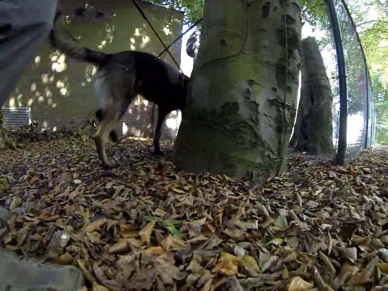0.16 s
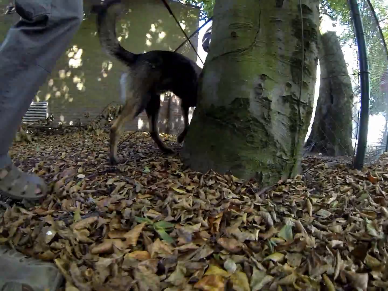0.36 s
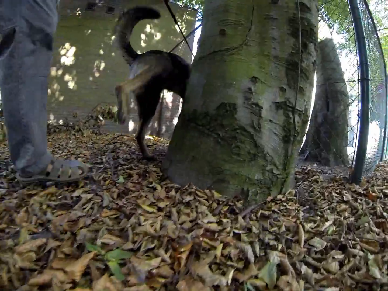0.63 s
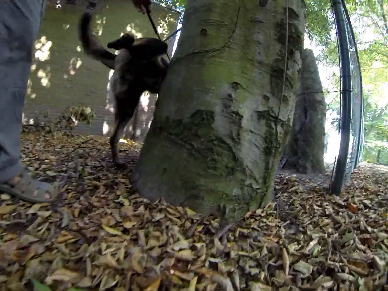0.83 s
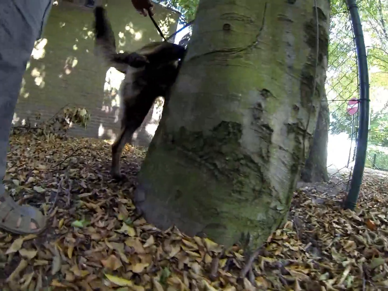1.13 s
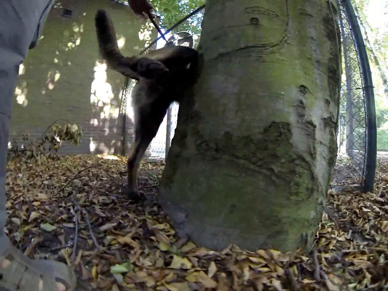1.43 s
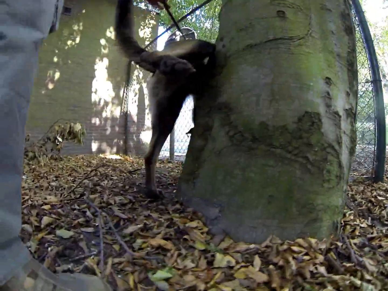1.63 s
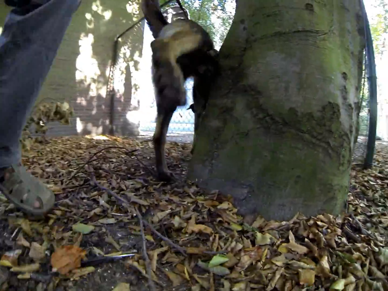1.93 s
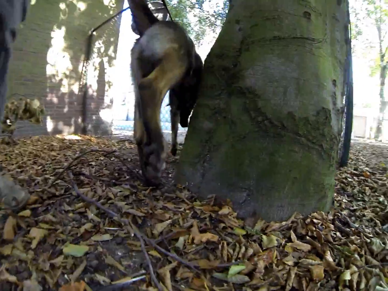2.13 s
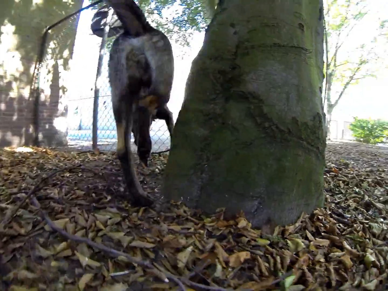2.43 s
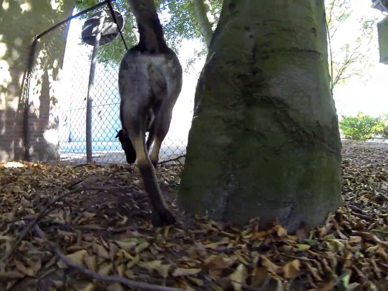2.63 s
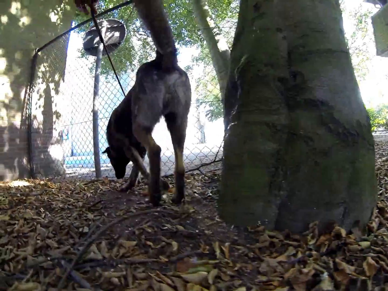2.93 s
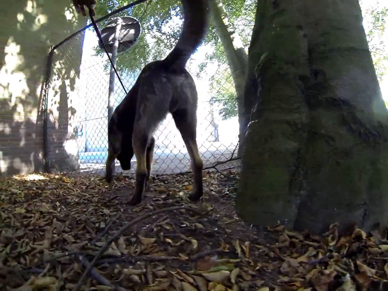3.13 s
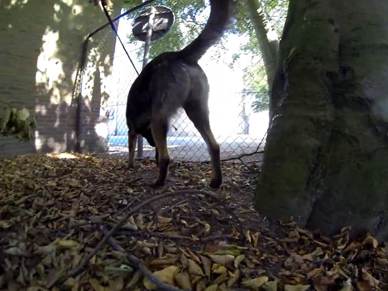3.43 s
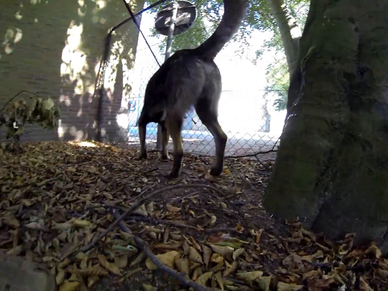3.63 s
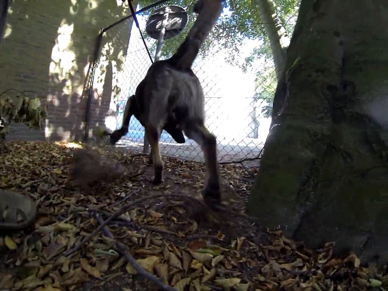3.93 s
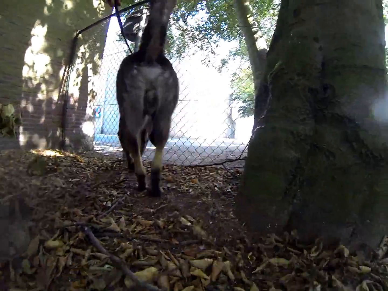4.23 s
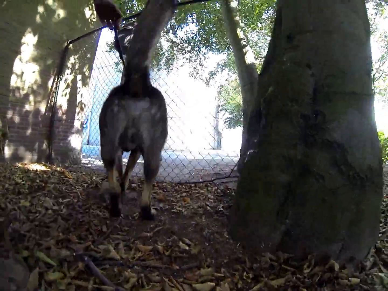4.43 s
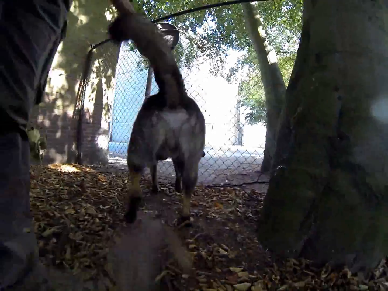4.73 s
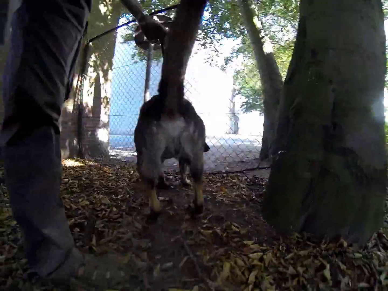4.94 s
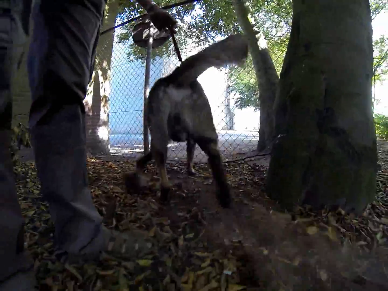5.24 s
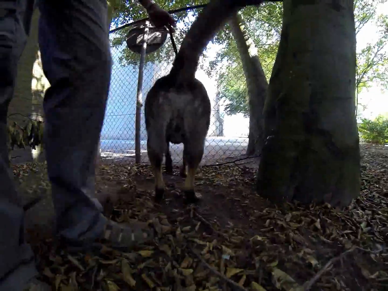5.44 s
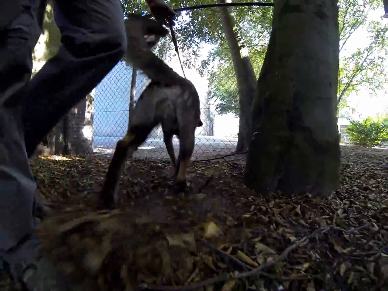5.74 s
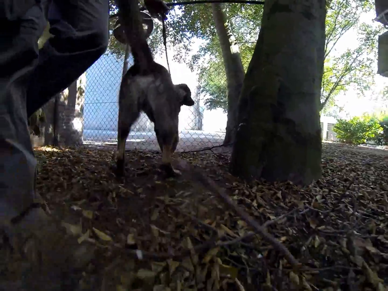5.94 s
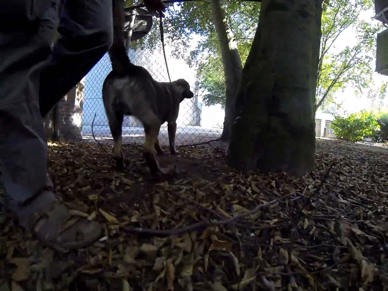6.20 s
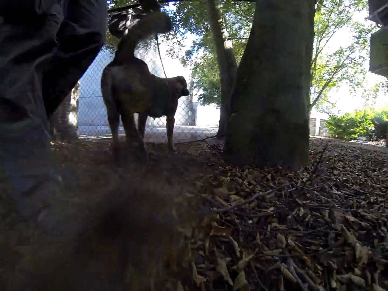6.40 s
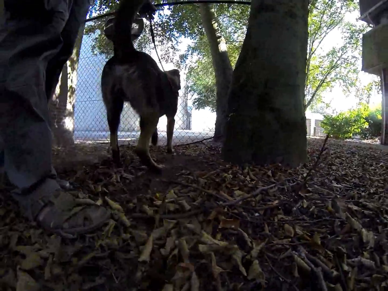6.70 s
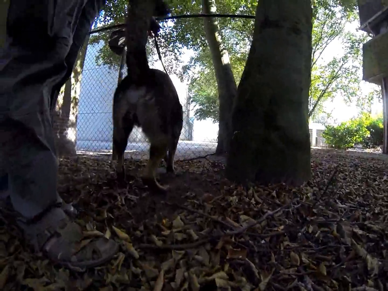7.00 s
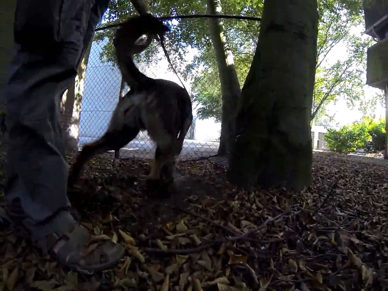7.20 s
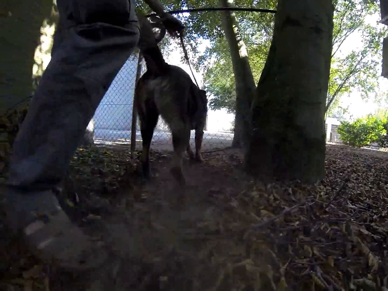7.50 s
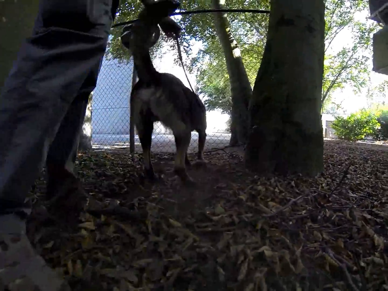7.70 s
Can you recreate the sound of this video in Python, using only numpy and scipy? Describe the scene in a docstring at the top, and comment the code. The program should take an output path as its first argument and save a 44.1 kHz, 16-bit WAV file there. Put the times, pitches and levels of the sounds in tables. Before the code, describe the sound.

Dry leaves rustle under paws and shoes, then get raked in brisk bursts; dirt smacks the microphone's plastic case twice, the first blow very loud.

```python
"""A dog and its walker shuffle through dry leaves; the dog rakes the litter with its hind paws and kicks it up.
Leaves are noise, random breaks and short ringing grains, shaped by strokes; twigs snap as brief force bursts.
Two volleys of dirt strike the plastic case of a hand-held camera, whose resonances also colour leaves and air.
Its handle sways, hums and bumps as damped or shaken modes. The hardest blows make a limiter duck everything."""
import sys
import numpy as np
from scipy import signal
from scipy.fft import rfft, irfft, next_fast_len
from scipy.io import wavfile
from scipy.ndimage import uniform_filter1d, minimum_filter1d, map_coordinates

SR = 44100
rng = np.random.default_rng(int(sys.argv[2]) if len(sys.argv) > 2 else 0)


def output_pcm(signal):
    """Save a mono or channel-first signal as 16-bit PCM at the path in sys.argv[1].

    Samples are clipped to [-1, 1] before scaling.
    """
    pcm = np.clip(np.atleast_2d(signal).T, -1, 1) * 32767
    wavfile.write(sys.argv[1], SR, np.round(pcm).astype(np.int16))


N = 346621
TIME = np.arange(N) / SR  # s
LEVEL_WINDOW = 66  # samples, 1.5 ms: the span of a short-time level

# Relative spectrum of dirt on the case, without the case resonances.
# Each row: frequency in Hz, density in dB per Hz.
CLOD_SPECTRUM = [(80, -10.5), (250, -6.5), (500, -9.5), (700, 0), (870, -11), (1100, -2), (1350, -3.5),
                 (1900, -3.5), (2800, -2), (4000, -6.5), (5500, -17), (7500, -17), (9000, -19.5),
                 (11000, -20.5), (14000, -24.5), (15600, -38)]


def amp(db):
    """Level to amplitude: 20 dB is a factor of ten."""
    return 10 ** (np.asarray(db) / 20)


def unit(x):
    """Normalisation to equal mean power: x at rms 1."""
    return x / np.sqrt(np.mean(x ** 2) + 1e-20)


def add(track, s, sound):
    """Superposition: add a sound to the track from time s in seconds."""
    part = track[round(s * SR):][:len(sound)]
    part += sound[:len(part)]


def filtered(x, response):
    """Linear filtering: multiply the spectrum of x by a response of frequency."""
    m = next_fast_len(len(x) + 8192)
    spectrum = rfft(x, m) * response(np.fft.rfftfreq(m, 1 / SR))
    return irfft(spectrum, m)[:len(x)]


def below(hz, edge_hz, order=8):
    """Soft low-pass response: the amplitude is halved at the edge."""
    return 1 / (1 + (hz / edge_hz) ** order)


def white():
    """White noise: independent random pressure at every sample."""
    return rng.standard_normal(N)


def case_ring(spectrum, size=4096):
    """Minimum-phase response: folding the cepstrum makes source colour and case resonances causal."""
    # Resonances of the case. Each row: frequency in Hz, width in Hz, lift in dB.
    case_modes = [(665, 78, 2), (1418, 310, 10), (1632, 265, 9), (2129, 174, 7), (2392, 47, 7),
                  (2753, 83, 2.5), (3010, 67, 4), (3488, 63, 5), (3896, 140, 7), (4910, 450, 5),
                  (5360, 160, 7), (6580, 610, 6), (10350, 480, 3)]
    hz = np.fft.rfftfreq(size, 1 / SR)
    source_hz, source_db = np.transpose(spectrum)
    db = np.interp(np.log(hz + 1), np.log(source_hz), source_db)
    for centre, width, lift in case_modes:
        db = db + lift * .5 ** ((2 * (hz - centre) / width) ** 2)
    cepstrum = irfft(np.log(amp(db)))
    cepstrum[1:size // 2] *= 2
    cepstrum[size // 2 + 1:] = 0
    return irfft(np.exp(rfft(cepstrum)))[:size // 2]


def through_case(x, spectrum):
    """Source-filter principle: x convolved with the response of source and case, at rms 1."""
    return unit(signal.fftconvolve(x, case_ring(spectrum))[:N])


def wobble(rate):
    """Slow random modulation: a spline through random knots, rate knots a second."""
    knots = rng.standard_normal(int(N * rate / SR) + 4)
    return map_coordinates(knots, [TIME * rate])


def drifting(x, depth_db, size=1024):
    """Time-varying colour: a smooth random gain over time and frequency, as other leaves or places take over."""
    bands = signal.stft(x, nperseg=size)[2]
    field = rng.standard_normal(bands.shape)
    field = uniform_filter1d(uniform_filter1d(field, size=14, axis=0), size=10, axis=1)
    return signal.istft(bands * amp(depth_db * unit(field)), nperseg=size)[1][:len(x)]


def stroke(length, attack, release, swell_db=0.5):
    """Envelope of a movement: smooth onset, slight arch, then exponential decay; times in seconds."""
    t = np.arange(int((length + 7 * release) * SR)) / SR
    onset = np.sin(np.pi / 2 * np.minimum(t / attack, 1))
    # swell_db is the rise from the ends to the middle
    arch_db = swell_db * (np.sin(np.pi * np.minimum(t / (length + release), 1)) - 2 / 3)
    decay = np.exp(-np.maximum(t - length, 0) / release)
    return onset * amp(arch_db) * decay


def movements(rows, attack, release):
    """Incoherent addition: the powers of strokes (start s, length s, dB) sum."""
    power = np.zeros(N)
    for s, length, db in rows:
        add(power, max(s, 0), (amp(db) * stroke(length, attack, release)) ** 2)
    return power


def swell(s, length):
    """Gaussian envelope around time s; length is twice its standard deviation, in seconds."""
    return np.exp(-np.minimum((2 * (TIME - s) / length) ** 2 / 2, 50))


def contact(ring, treble_db, crumble, grit, split_hz, size=4096):
    """Impact excitation: a push and decaying grit ring a response; the loudest 1.5 ms has rms 1."""
    t = np.arange(size) / SR
    force = grit * rng.standard_normal(size) * amp(-20 * t / crumble)  # falls 20 dB in crumble seconds
    force[0] += 1
    x = signal.fftconvolve(force, ring)[:size]
    body = signal.sosfilt(signal.butter(2, split_hz, fs=SR, output="sos"), x)
    edge = signal.sosfilt(signal.butter(4, split_hz, "high", fs=SR, output="sos"), x)
    x = unit(body) + amp(treble_db) * unit(edge)
    return x / np.sqrt(uniform_filter1d(x ** 2, size=LEVEL_WINDOW).max())


def footwork():
    """Power summation per band: gains of rustle, crisp top and low crunch from all leaf movements."""
    # Paws and shoes treading on leaves. Each row: start in seconds, length in seconds, rustle level in dB,
    # crisp top in dB re rustle, low crunch in dB re rustle.
    step_rows = [(0.0, 0.016, -50, -10, 2), (.09, 0.089, -57, -15, -4), (0.252, .24, -54, -13, 2.5),
                 (0.66, 0.13, -56, -19, -2.5), (.84, 0.33, -57, -18, -0.5), (1.007, 0.085, -45.5, -18, 1.5),
                 (1.086, 0.067, -43, -20, -2), (1.17, 0.096, -54, -22, -2), (1.517, 0.085, -62, -15, 8),
                 (1.679, 0.091, -51, -13.5, 3), (1.794, 0.052, -48, -15, -4.5),
                 (1.902, 0.11, -56.5, -15, -3), (2.104, .09, -54.5, -15, 6.5), (2.753, 0.41, -60.5, -16, 0),
                 (3.183, 0.17, -52, -15.5, 0), (3.318, 0.048, -43, -17.5, -0.5),
                 (3.402, .12, -53, -19, 0.5), (3.563, 0.047, -53, -19, 7), (3.655, .23, -52.5, -13, 2.5),
                 (4.27, 0.14, -53, -17, 4.5), (5.081, 0.028, -44.5, -14, 4.5), (7.2, 0.043, -49.5, -22, -2),
                 (7.72, 0.028, -47.5, -14, 3.5), (7.805, .06, -52, -15.5, -5)]
    # Hind paws raking the litter backwards. Each row: start in seconds, length in seconds,
    # rustle level in dB, crisp top in dB re rustle.
    scrape_rows = [(3.915, .07, -43, -12), (4.051, 0.15, -43, -14.5), (4.215, 0.19, -47.5, -15.5),
                   (4.46, 0.064, -42, -14), (4.53, 0.061, -39, -18), (4.689, .2, -44, -16),
                   (4.993, 0.028, -43.5, -14), (5.064, 0.025, -41.5, -12.5), (5.19, 0.21, -46.5, -15),
                   (5.4, 0.21, -44, -15), (5.625, 0.056, -40.5, -13), (5.681, 0.028, -37, -16),
                   (5.785, 0.17, -41, -13.5), (5.922, 0.094, -35.5, -15.5), (6.053, 0.055, -38, -17),
                   (6.259, 0.039, -40, -17.5), (7.06, .07, -46, -17), (7.171, 0.073, -51, -15),
                   (7.27, 0.13, -45, -16)]
    # Leaves kicked high pattering down. Each row: start in seconds, length in seconds, rustle level in dB.
    shower_rows = [(3.95, 2.6, -53.5), (6.481, 0.14, -39.5), (7.401, 0.073, -36)]
    scrape_crunch_db = -5.5
    shower_crisp_db, shower_crunch_db = -13, -9
    stir_levels_db = -64 + np.array([0, -13.5, -4.5])  # the litter is never quite still

    treads = [(s, length, db + np.array([0, crisp, crunch])) for s, length, db, crisp, crunch in step_rows]
    rakes = [(s, length, db + np.array([0, crisp, scrape_crunch_db])) for s, length, db, crisp in scrape_rows]
    showers = [(s, length, db + np.array([0, shower_crisp_db, shower_crunch_db]))
               for s, length, db in shower_rows]
    # attack and release in seconds: a tread presses and stops, flung leaves take a while to settle
    kinds = [(treads, 0.025, 0.039), (rakes, 0.049, 0.072), (showers, 0.03, 0.16)]
    gains = []
    for band, stir_db in enumerate(stir_levels_db):
        power = amp(stir_db) ** 2
        for rows, attack, release in kinds:
            band_rows = [(s, length, db[band]) for s, length, db in rows]
            power = power + movements(band_rows, attack, release)
        gains.append(np.sqrt(power))
    return gains


def crackle(rate=700, low_hz=1400, high_hz=11000, cycles=5, scatter_db=3.0, size=256):
    """Granular excitation: leaves break one by one, each a damped sine at its own pitch; rms 1."""
    draws = rng.random((int(rate * N / SR), 4))
    start = (draws[:, :1] * N).astype(int)
    hz = low_hz + (high_hz - low_hz) * draws[:, 1:2]
    loudness = amp(scatter_db * np.minimum(-np.log(draws[:, 2:3]), 4))
    sign = np.sign(draws[:, 3:] - .5)
    turns = hz * np.arange(size) / SR
    grains = loudness * sign * np.sqrt(hz) * np.exp(-turns / cycles) * np.sin(2 * np.pi * turns)
    places = start + np.arange(size)
    return unit(np.bincount(places.ravel(), grains.ravel(), N)[:N])


def leaves(cracks_per_s=3200, scatter_db=1.0, slide=1.0, clump_db=1.26, crackle_db=-2):
    """Stochastic friction and fracture: many clumped edge breaks over the hiss of sliding leaves."""
    # Relative spectrum of leaves without the case. Each row: frequency in Hz, density in dB per Hz.
    leaf_spectrum = [(200, -30.5), (1100, -25.5), (1350, -12), (1900, -16.5), (2300, -12.5), (3500, -5.5),
                     (4300, -9), (5900, -14), (7000, -13.5), (8000, -13.5), (9200, -24), (11000, -23.5),
                     (14000, -30), (15600, -45.5)]
    rustle_gain, crisp_gain, crunch_gain = footwork()
    breaks = rng.random(N) < cracks_per_s / SR
    sizes = rng.choice([-1, 1], N) * amp(scatter_db * np.minimum(rng.exponential(size=N), 4.5))
    force = unit(breaks * sizes) + slide * white() + amp(crackle_db) * crackle()
    x = drifting(through_case(force, leaf_spectrum), depth_db=2.0) * amp(clump_db * wobble(50))
    # each movement has its own balance of low crunch, rustle and crisp top
    crunch = filtered(x, lambda hz: below(hz, 1700, order=16))
    crisp = filtered(x, lambda hz: 1 - below(hz, 8330, order=16))
    rustle = x - crunch - crisp
    return rustle_gain * unit(rustle) + crisp_gain * unit(crisp) + crunch_gain * unit(crunch)


def drone(centre_hz, width_hz):
    """Randomly driven resonance: narrow-band noise divided by its slow envelope, rms 1."""
    band = filtered(white(), lambda hz: below(abs(hz - centre_hz), width_hz / 2, order=2))
    analytic = signal.hilbert(band, next_fast_len(N))[:N]
    power = np.abs(uniform_filter1d(abs(analytic) ** 2, size=4000))
    return unit(analytic.real / np.sqrt(power + 1e-20))


def handle():
    """Modal response: the handle sways on its lowest mode; grip shifts make the mount hum and rub dully."""
    # Slow sway of the handle. Each row: time in seconds, level in dB.
    sway_rows = [(0.0, -37.5), (0.71, -47.5), (1.31, -33.5), (1.42, -45), (1.98, -36.5), (2.46, -51.5),
                 (2.62, -38), (2.87, -46.5), (4.2, -48), (4.34, -34.5), (4.96, -41), (5.44, -36),
                 (5.67, -50), (5.74, -37), (5.88, -45.5), (6.36, -41)]
    # The hand shifts its grip. Each row: start in seconds, length in seconds, mount hum in dB, rub in dB.
    grip_rows = [(0.821, 0.056, -38, -51), (.94, 0.057, -51, -51), (1.15, 0.053, -53, -55),
                 (1.29, 0.063, -52, -52.5), (1.614, 0.12, -41, -49), (1.749, 0.15, -47, -47),
                 (1.916, 0.14, -45, -50), (2.107, .26, -50, -55), (2.51, 0.14, -47.5, -53),
                 (2.8, 0.1, -46, -54), (2.995, .22, -42.5, -54), (4.248, .05, -45, -52.5),
                 (4.395, 0.23, -44.5, -49.5), (4.87, 0.14, -45.5, -57.5), (5.11, 0.13, -53, -59),
                 (5.683, 0.06, -66, -50), (6.192, 0.099, -53, -52.5), (6.701, 0.26, -41, -55),
                 (7.202, 0.053, -39, -48.5), (7.314, 0.041, -47.5, -57), (7.54, .07, -45.5, -53),
                 (7.703, 0.065, -41.5, -47.5)]
    attack, release = 0.017, .035  # s
    hum_rest_db, rub_rest_db = -56.5, -61  # in a still hand
    sway_s, sway_level = np.transpose(sway_rows)
    sway_db = np.interp(TIME, sway_s, sway_level)
    hum_shifts = [(s, length, hum_db) for s, length, hum_db, _ in grip_rows]
    rub_shifts = [(s, length, rub_db) for s, length, _, rub_db in grip_rows]
    hum_gain = np.sqrt(amp(hum_rest_db) ** 2 + movements(hum_shifts, attack, release))
    rub_gain = np.sqrt(amp(rub_rest_db) ** 2 + movements(rub_shifts, attack, release))
    sway = amp(sway_db) * drone(28.0, 13.5)
    hum = hum_gain * drone(74.3, 10.8)
    rub = unit(filtered(white(), lambda hz: below(hz, 196, order=6) * (1 - below(hz, 117))))
    return sway + hum + rub_gain * amp(2.2 * wobble(22)) * rub


def air(start_db=-57, rise_db_per_s=0.61):
    """Diffuse background: slowly growing outdoor noise, coloured by the case and slightly restless."""
    # Relative outdoor spectrum without the case. Each row: frequency in Hz, density in dB per Hz.
    outdoor_spectrum = [(100, 5.5), (250, 0.5), (450, -3), (1100, -5.5), (1400, -3), (1900, -5.5),
                        (3000, -9.5), (6000, -25.5), (10000, -29.5), (15000, -33.5)]
    level_db = start_db + rise_db_per_s * TIME
    wash = drifting(through_case(white(), outdoor_spectrum), depth_db=1.6)
    return amp(level_db + 0.68 * wobble(6.5) + 1.2 * wobble(45)) * wash


def snaps():
    """Brittle fracture: sharp breaks excite the case; the softer the crack, the more its low ring shows."""
    # Twigs and leaf stalks snapping, crumbs landing. Each row: time in seconds, level in dB before the trim,
    # crack in dB re the body before its lift, split frequency in Hz above which the crack lies.
    snap_rows = [(0.0468, -26.5, -13, 4500), (.0777, -33, -14, 2230), (.169, -33, -8, 2230),
                 (.187, -25.5, 3, 2230), (.6662, -34, -19, 2230), (.945, -39, -13, 2230),
                 (1.0209, -25.5, -19, 2230), (1.5837, -34, -18, 2230), (1.694, -38, -14, 2230),
                 (2.011, -33, -8, 2230), (2.123, -35, -10, 2230), (2.9881, -38, -3, 8000),
                 (3.3379, -26, -6, 2230), (3.4232, -26.5, -16.5, 2230), (3.5861, -27.5, -14, 2230),
                 (3.6573, -36, -12, 4500), (3.9293, -29, -18, 2230), (4.004, -30, -8, 4500),
                 (5.2574, -35, -16, 2230), (6.0766, -22.5, 1, 2230), (6.4795, -16, -9, 2230),
                 (7.637, -15, -9.5, 2230)]
    # Relative spectrum of a snap without the case. Each row: frequency in Hz, density in dB per Hz.
    snap_spectrum = [(200, -24), (950, -24.5), (1250, 3), (1900, -4), (2900, -2), (4500, -6), (8000, -16.5),
                     (11000, -26.5), (15500, -32)]
    trim_db, crack_lift_db = -8.0, 11.5  # added to every level and every crack
    # small stalks give way at random; levels before trim and lift
    ticks_per_s, tick_db, tick_spread_db, tick_crack_db, tick_split_hz = 8, -45, 5.5, -5.5, 3500
    out, ring = np.zeros(N), case_ring(snap_spectrum)
    draws = rng.random((int(ticks_per_s * N / SR), 2))
    ticks = [(when * N / SR, tick_db + tick_spread_db * (2 * size - 1), tick_crack_db, tick_split_hz)
             for when, size in draws]
    for s, db, crack_db, split_hz in list(snap_rows) + ticks:
        snap = contact(ring, crack_db + crack_lift_db, crumble=0.0062, grit=0.29, split_hz=split_hz)
        add(out, s, amp(db + trim_db) * snap)
    return out


def bumps(wall_hz=686, wall_t60=0.11, rise=0.0038, trim_db=-1.5):
    """Damped modes: soft knocks thud in the handle, and a few also ring the case wall."""
    # Soft bumps of the handle. Each row: time in seconds, level in dB before the trim, pitch in Hz,
    # ring of the case wall in dB re the first mode of the thud.
    bump_rows = [(.837, -30, 95, -36), (1.32, -39, 132, -40), (1.645, -39, 85, -40), (1.871, -19, 184, -23),
                 (1.965, -30.5, 151, -40), (2.599, -25, 159, -40), (4.261, -34, 152, -35),
                 (4.38, -27.5, 142, -38), (5.205, -38.5, 185, -38), (7.402, -36, 126, -12),
                 (7.73, -23.5, 170, -39)]
    # Modes of a thud. Each row: multiple of the pitch (no unit), level in dB, T60 in seconds.
    thud_modes = [(1, 3.5, 0.068), (1.35, -13, 0.036), (2.3, -18, 0.021)]
    out, t = np.zeros(N), np.arange(SR // 4) / SR
    wall = amp(-60 * t / wall_t60) * np.sin(2 * np.pi * wall_hz * t)
    onset = 1 - np.exp(-t / rise)
    for s, db, hz, wall_db in bump_rows:
        thud = sum(amp(level - 60 * t / t60) * np.sin(2 * np.pi * hz * ratio * t)
                   for ratio, level, t60 in thud_modes)
        add(out, s, amp(db + trim_db) * onset * (thud + amp(wall_db) * wall))
    return out


def scuffs():
    """Sliding friction: something soft brushes the case, heard as dull noise that follows the pressure."""
    # Dull scuffs. Each row: centre in seconds, level in dB, length in seconds.
    scuff_rows = [(1.533, -52, 0.048), (6.237, -45, 0.03), (6.94, -45, .045), (7.238, -48, 0.026)]
    # Relative scuff spectrum without the case. Each row: frequency in Hz, density in dB per Hz.
    scuff_spectrum = [(100, -14), (400, 0), (700, -14), (1100, 0), (1500, 5.5), (2100, 1), (3000, -24),
                      (6000, -24), (15000, -45)]
    pressure = sum(amp(db) * swell(s, length) for s, db, length in scuff_rows)
    return pressure * amp(2.5 * wobble(150)) * through_case(white(), scuff_spectrum)


def squeaks(width_hz=1100):
    """Narrow-band noise: fuzzy high tones sound faintly over the leaves."""
    # Thin squeaks. Each row: centre in seconds, level in dB, length in seconds, pitch in Hz.
    squeak_rows = [(2.878, -66, 0.049, 7960), (3.108, -59, .03, 8150)]
    out = np.zeros(N)
    for s, db, length, hz in squeak_rows:
        tone = unit(filtered(white(), lambda f: below(abs(f - hz), width_hz / 2, order=4)))
        out += amp(db) * swell(s, length) * tone
    return out


def dirt():
    """Impact and crumbling: clods burst on the case in quick volleys and excite its resonances."""
    # Clods striking the case. Each row: time in seconds, level of the loudest 1.5 ms in dB,
    # treble in dB re the body, crumbling time (20 dB fall) in seconds.
    clod_rows = [(6.4059, -6.5, -7.5, 0.0036), (6.4131, -8.5, -12, 0.0086), (6.416, -2, -21, 0.0047),
                 (6.417, 9.5, -22, 0.0036), (6.43, -4, -7, 0.0076), (7.389, -13, -0.5, 0.0066),
                 (7.3924, -10.5, -7.5, 0.0044), (7.3962, -20.5, -8.5, 0.005), (7.4032, -16, -12, .012),
                 (7.4075, -10.5, -15.5, 0.0071), (7.4106, -17.5, -10.5, .011), (7.421, -21.5, 1, 0.012),
                 (7.437, -20.5, -9, .007)]
    out, ring = np.zeros(N), case_ring(CLOD_SPECTRUM)
    for s, db, treble_db, crumble in clod_rows:
        add(out, s, amp(db) * contact(ring, treble_db, crumble, grit=0.34, split_hz=4960))
    return out


def spray(attack=.003, fall=0.037, grains_per_s=2200, treble_db=8, treble_hz=4500):
    """Random impulse train: fine soil patters on the case behind the clods, then dies away."""
    # Fine soil that follows each volley. Each row: start in seconds, level in dB.
    spray_rows = [(6.406, -22.5), (7.39, -24.5)]
    grains = (rng.random(N) < grains_per_s / SR) * white()
    patter = through_case(grains, CLOD_SPECTRUM)
    # brighter than the clods
    patter = filtered(patter, lambda hz: amp(treble_db * (1 - below(hz, treble_hz, order=4))))
    power = movements([(s, attack, db) for s, db in spray_rows], attack, fall)
    return unit(patter) * np.sqrt(power)


def jolt(start=6.4168):
    """Free vibration: after the heaviest clod the mount rings on and the camera body thuds briefly."""
    # What the jolt sets ringing. Each row: frequency in Hz, level in dB, T60 in seconds,
    # rise time constant in seconds.
    jolt_modes = [(75.3, 1.5, 0.37, .2), (140, -18.5, 0.25, .004), (208, -5.5, .05, 0.0014),
                  (374, -0.5, .03, 0.00085), (680, 0, 0.039, .001)]
    out, t = np.zeros(N), np.arange(SR) / SR
    for hz, db, t60, rise in jolt_modes:
        mode = amp(db - 60 * t / t60) * (1 - np.exp(-t / rise)) * np.sin(2 * np.pi * hz * t)
        add(out, start, mode)
    return out


def scene():
    """Superposition: all sources add at one microphone."""
    ground = leaves() + snaps() + squeaks() + air()
    camera = handle() + bumps() + scuffs() + dirt() + spray() + jolt()
    return (ground + camera)[None]


def limited(x, ceiling_db=-4.5, hold_s=.4, recover_db_per_s=25):
    """Gain control: a level over the ceiling cuts the gain at once; it holds, then climbs back."""
    level_db = 10 * np.log10(np.abs(uniform_filter1d(x ** 2, size=LEVEL_WINDOW)) + 1e-12)
    hold = int(hold_s * SR)
    cut_db = np.minimum(ceiling_db - level_db, 0)
    held_db = minimum_filter1d(cut_db, hold, origin=(hold - 1) // 2)  # the window looks back only
    climb_db = recover_db_per_s * TIME
    return x * amp(np.minimum.accumulate(held_db - climb_db) + climb_db)


def record(dry, top_hz=15650):
    """Nonlinear limits, then band limiting: limiter, clipping at full scale, and nothing above top_hz."""
    clipped = [np.clip(limited(x), -1, 1) for x in dry]
    return np.array([filtered(x, lambda hz: hz < top_hz) for x in clipped])


dry = scene()
out = record(dry)
output_pcm(out)
```